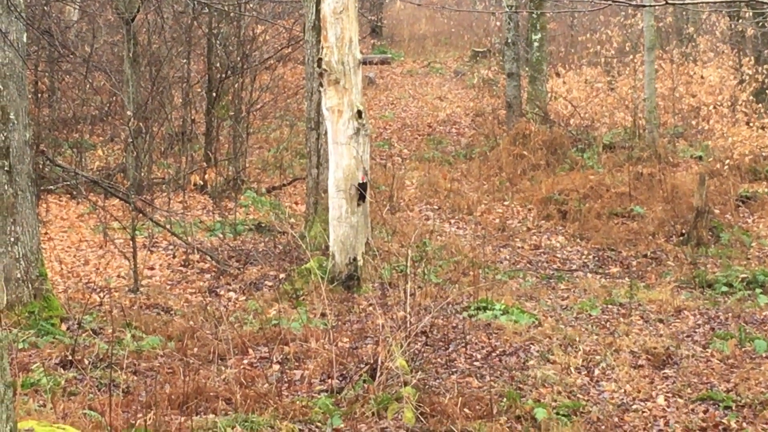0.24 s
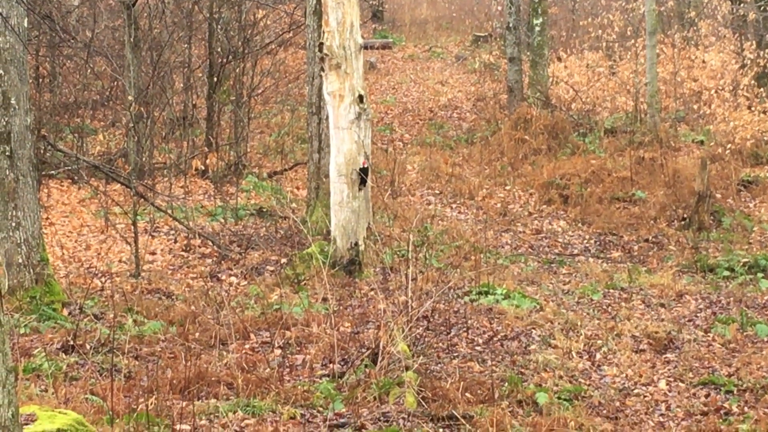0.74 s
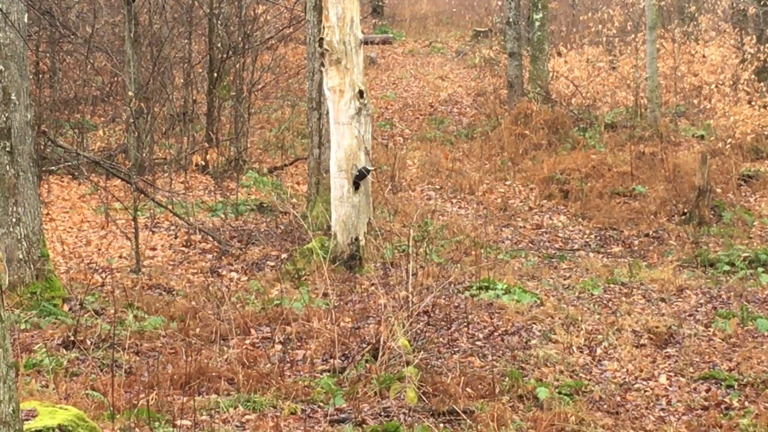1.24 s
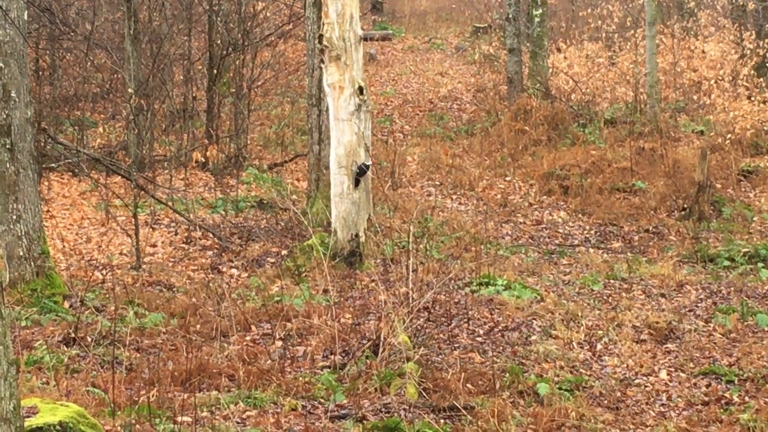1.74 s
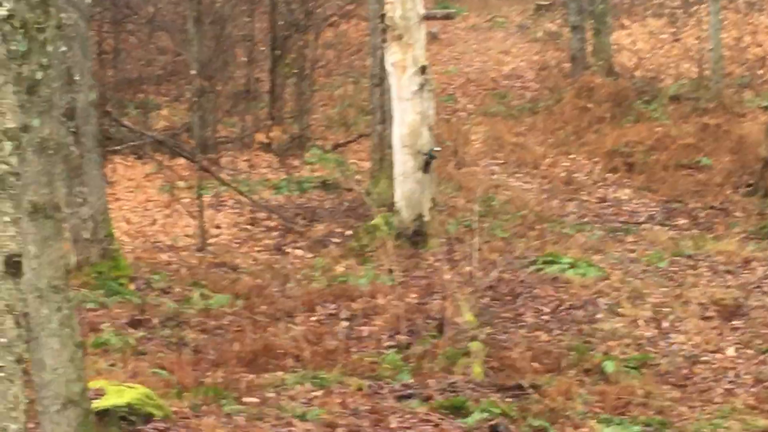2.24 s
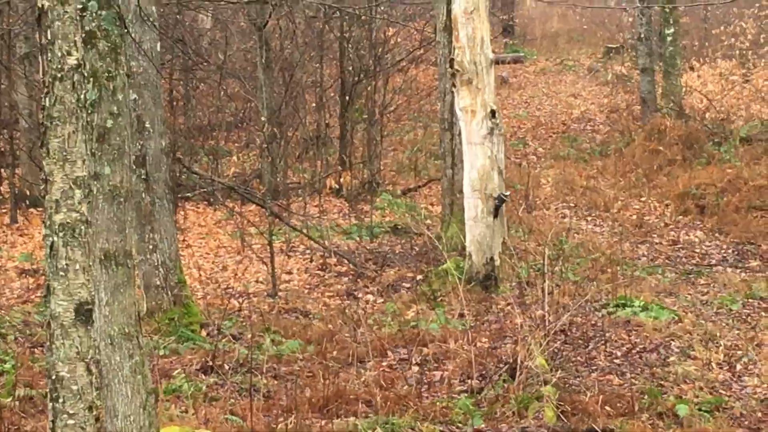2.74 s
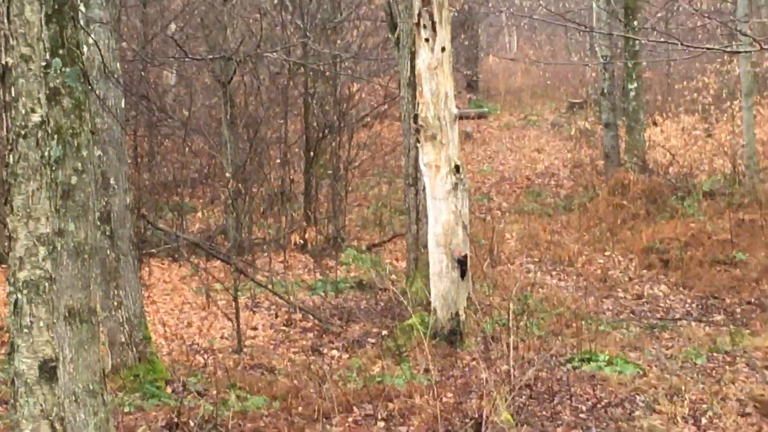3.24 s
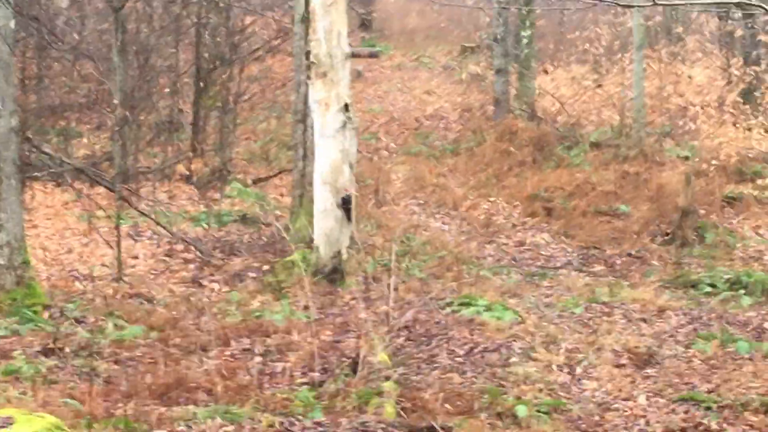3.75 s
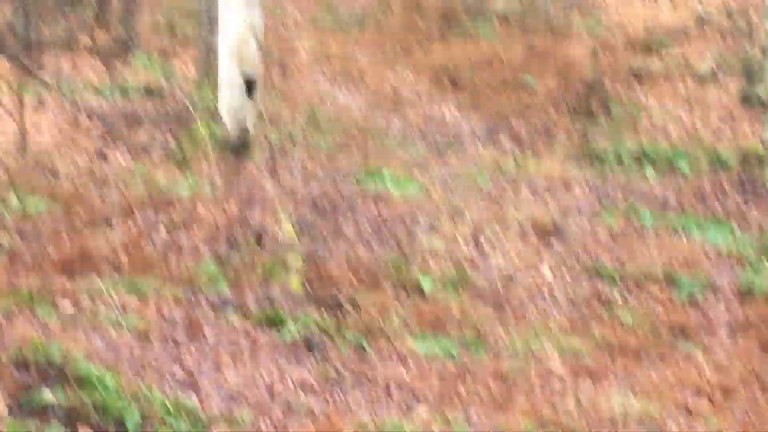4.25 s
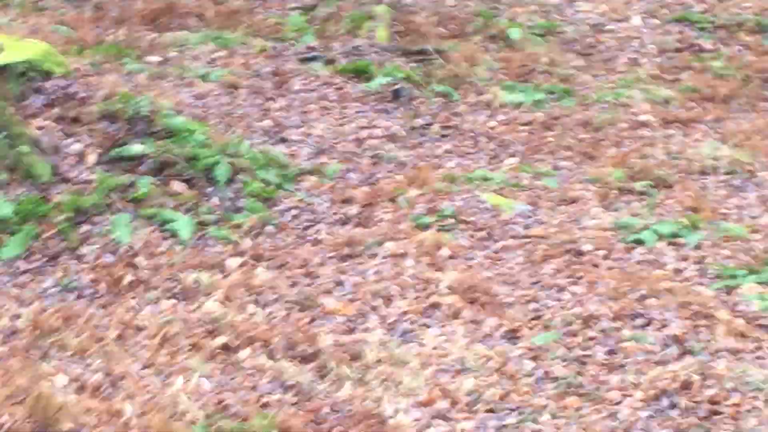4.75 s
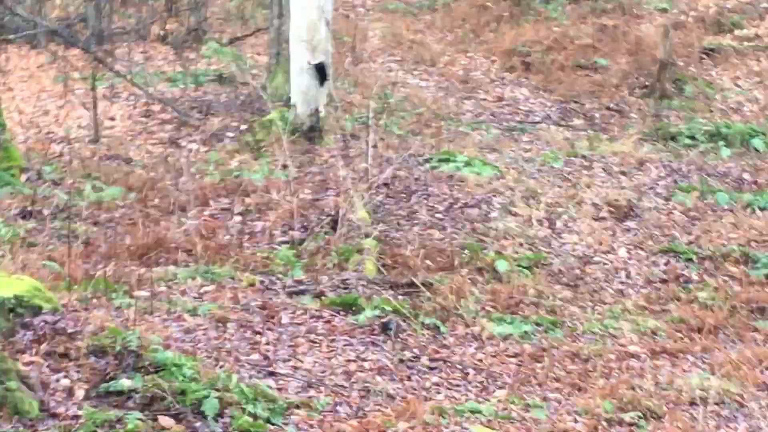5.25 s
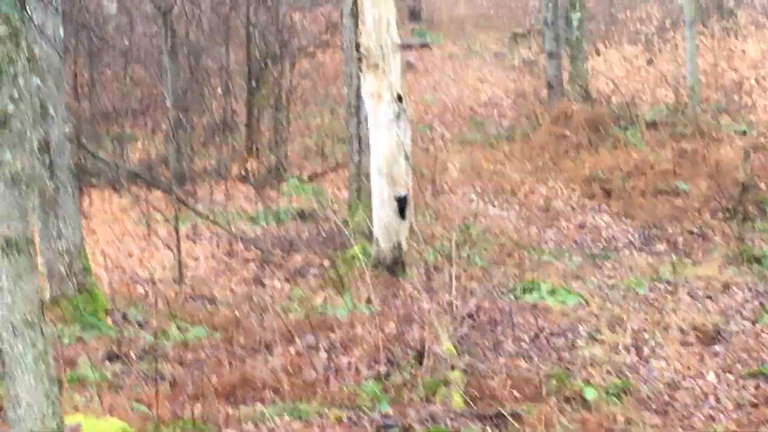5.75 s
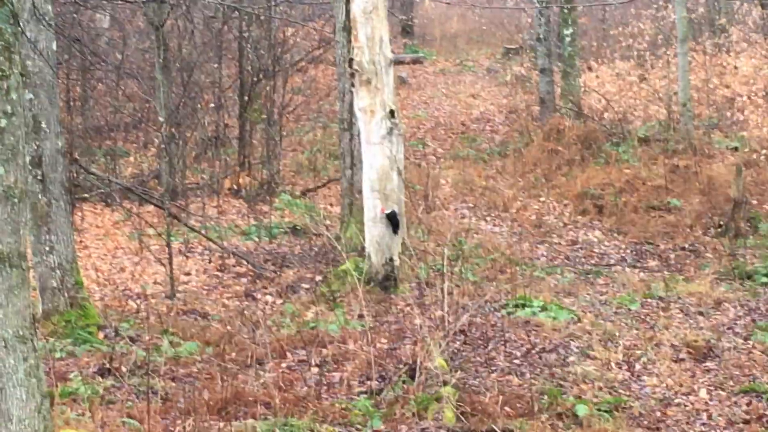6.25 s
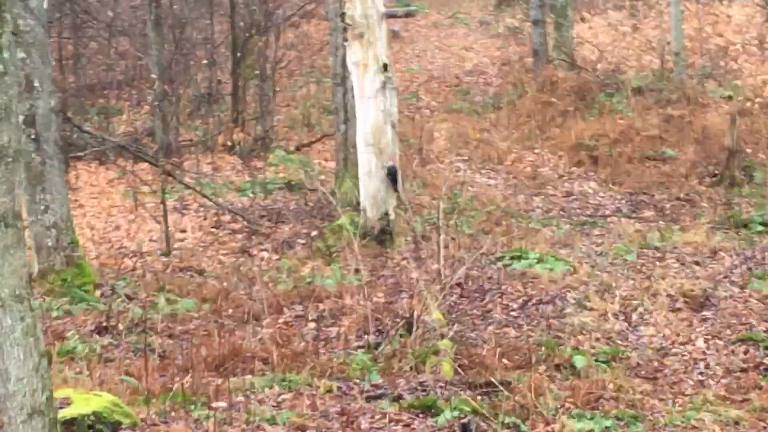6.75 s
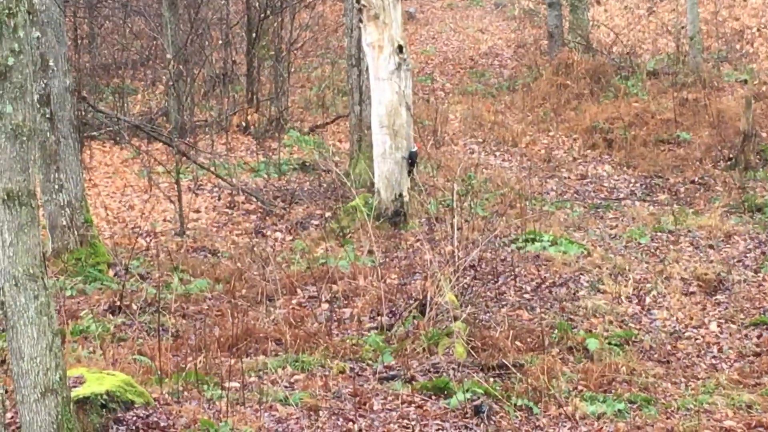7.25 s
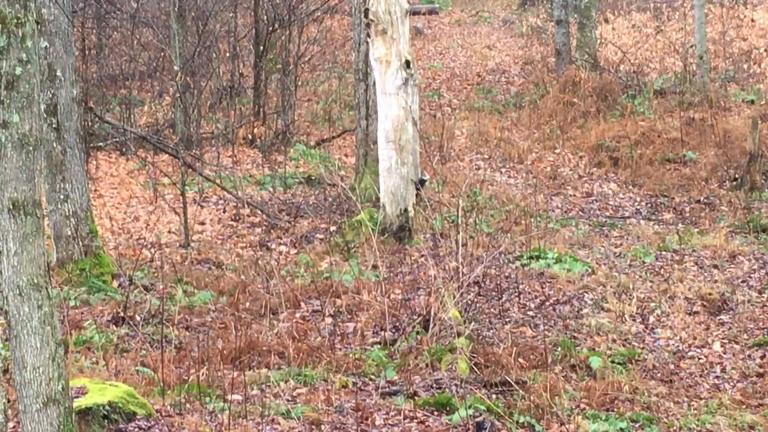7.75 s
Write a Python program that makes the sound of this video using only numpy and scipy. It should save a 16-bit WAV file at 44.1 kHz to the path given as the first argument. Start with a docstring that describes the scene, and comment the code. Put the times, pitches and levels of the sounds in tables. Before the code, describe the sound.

Quiet damp woodland, handheld camera microphone. A distant woodpecker gives faint, dull, irregular single pecks on rotten wood among tiny bright drips. A loud wet double splat hits close at 1.5 seconds. Handling thumps and leafy scuffs follow in bursts near 2.4, 2.9, 3.7 and 4.5, with a hard rap at 4.1. Later it calms, apart from a padded thud at 6.5. Low rumble and thin hiss lie beneath.

```python
"""Woodpecker in a dripping wood

A woodpecker chisels at a dead trunk some way off: noise bursts through broad resonances. Drops tick likewise,
as do a few droplets and a case knock among the pecks, and bright clicks of bumps and steps among the ticks.
Three loud knocks land right at the camera, like heavy drips or a finger on its case: damped modes and noise.
Its holder shifts their footing: clothes and leaves are grainy coloured noise, grip bumps are decaying sines.
Under all lie a low rumble and a faint hiss, both coloured noise."""
import sys
import numpy as np
from scipy.fft import rfft, irfft, next_fast_len
from scipy.io import wavfile
from scipy.ndimage import map_coordinates

SR = 44100
rng = np.random.default_rng(int(sys.argv[2]) if len(sys.argv) > 2 else 0)


def put_to_file(sound):
    """Save the sound as 16-bit audio at rate SR, in the file named by the first command-line argument."""
    columns = np.atleast_2d(sound).T  # one column per channel
    safe = np.clip(columns, -1, 1)
    whole_steps = np.round(safe * 32767)
    wavfile.write(sys.argv[1], SR, whole_steps.astype(np.int16))


N = 353020

# Spectra of the far rumble and the hiss. Each row: frequency in Hz, relative level per Hz in dB.
RUMBLE_COLOUR = [(15, -42), (25, -10), (54, -1.5), (92, 0.5), (118, -3), (147, -1), (210, -6), (305, -8),
                 (377, -12), (419, -13), (472, -19.5), (600, -20.5), (780, -28), (1320, -120)]
HISS_COLOUR = [(290, -54), (500, -8.5), (1000, -21), (1300, -3.5), (1780, -10), (2000, -8.5), (3260, -9.5),
               (3610, -11.5), (5070, -17), (7010, -18), (12100, -24), (17000, -29)]
# Clearest drops, twig snaps, and bright clicks of bumps and steps. Each row: start in seconds,
# relative level in dB, pitch in Hz.
CLEAR_TICKS = [(0.255, -46, 6500), (0.68, -42, 6450), (1.384, -44.5, 6500), (2.055, -40.5, 3260),
               (2.8803, -33, 3400), (2.9, -29, 2370), (2.9295, -33, 3000), (2.9374, -29.5, 2800),
               (2.9478, -22, 1900), (2.9635, -27, 3000), (3.6792, -28.5, 1500), (3.709, -33, 4500),
               (3.7208, -26, 1700), (3.7313, -27, 4200), (3.7535, -38, 1600), (3.7635, -31.5, 3780),
               (3.7735, -28.5, 1500), (4.4135, -40, 4500), (4.449, -44, 6000), (4.513, -46, 5500),
               (4.615, -32, 2410), (4.7451, -34, 9900), (4.762, -42, 6500), (5.0, -35, 4700),
               (5.0784, -36.5, 4100), (5.177, -36.5, 4100), (5.2655, -42, 5500), (5.2822, -36, 6000),
               (5.399, -39.5, 6500), (5.597, -41, 6500), (5.629, -45, 6000), (5.7515, -46, 5250),
               (5.8697, -41, 4450), (6.182, -47.5, 6000), (6.277, -41, 6500), (6.415, -30.5, 5500),
               (6.5455, -43, 6000), (6.641, -33, 7740), (6.641, -37, 2200)]
# Movement of the jacket. Each row: time in seconds, relative rustle level in dB, relative swish level in dB.
JACKET_MOTION = [(0.0, -60.5, -65.5), (1.0, -61.5, -72), (2.15, -62, -71), (2.42, -55.5, -59),
                 (2.7, -61, -63.5), (3.1, -58.5, -67), (3.55, -56, -57.5), (3.8, -59, -67),
                 (3.98, -54.5, -57), (4.22, -62.5, -59), (4.42, -60, -55.5), (4.52, -58.5, -54),
                 (4.64, -57, -54), (4.85, -58.5, -56), (4.94, -63.5, -63), (5.22, -63.5, -56.5),
                 (5.5, -65, -61.5), (6.3, -67, -61), (6.85, -64, -62.5), (8.0, -69.5, -67)]
# Spectra of the jacket's rustle and swish. Each row: frequency in Hz, relative level per Hz in dB.
RUSTLE_COLOUR = [(180, -49), (300, -8.5), (439, -3), (547, -8.5), (1010, -4.5), (1510, -16), (2170, -15),
                 (2750, -25.5), (3740, -18), (5020, -26.5), (8510, -30.5), (10000, -33), (13000, -92),
                 (22000, -120)]
SWISH_COLOUR = [(2350, -11.5), (4000, -8), (4510, -15), (5650, -9.5), (9390, -16), (12900, -17.5),
                (17000, -25)]
# Strokes of a sleeve. Each row: middle in seconds, level in dB, half-length in seconds, pitch in Hz,
# width in octaves.
SLEEVE_STROKES = [(2.393, -58.5, 0.021, 9900, 0.45), (2.449, -65, 0.063, 6500, 0.71),
                  (2.92, -68, 0.04, 15000, 0.35), (2.975, -52, 0.044, 3360, 0.73),
                  (3.5, -65, 0.026, 11000, 0.45), (3.491, -61, 0.07, 1500, 0.6),
                  (3.932, -56.5, 0.016, 1880, 0.4), (4.659, -65, 0.12, 2540, 0.37),
                  (6.802, -54.5, 0.022, 1310, 0.4)]
# Scuffs of shoes and leaves. Each row: start in seconds, level in dB, swell in seconds, T60 in seconds,
# tilt in dB per octave, upper edge in Hz.
FOOT_SCUFFS = [(2.431, -40.5, 0.0093, 0.12, -3, 7000), (2.562, -43, 0.013, 0.12, -3.5, 7000),
               (2.888, -45.5, 0.0053, 0.27, 0.5, 4500), (2.927, -39.5, .003, 0.025, 1, 7500),
               (2.944, -32.5, 0.0057, 0.071, 2, 6200), (2.952, -40.5, 0.016, 0.21, -0.5, 6150),
               (3.224, -43.5, 0.019, 0.069, -2, 9000), (3.657, -35, 0.022, 0.098, 0.1, 15000),
               (3.692, -38.5, 0.016, 0.04, 0.3, 16000), (3.7208, -34, 0.002, 0.073, -0.5, 4500),
               (3.729, -28, 0.0038, 0.024, 0, 9000), (3.818, -44, 0.011, 0.11, -2, 5000),
               (4.372, -42, 0.012, 0.12, -2.5, 2800), (4.608, -53, 0.0056, 0.23, 3, 3200),
               (4.883, -47.5, 0.007, 0.06, 0, 4000)]
# Spectrum of friction before tilting. Each row: frequency in Hz, relative level per Hz in dB.
FRICTION_COLOUR = [(200, -8), (340, -2.5), (406, -8.5), (517, -13.5), (725, -6.5), (969, -10.5), (1070, -7),
                   (1140, -11), (2000, -11), (2760, -19), (4340, -17), (8530, -28.5), (12200, -36),
                   (16000, -35)]
# Bumps of the grip. Each row: start in seconds, thump level in dB, thump pitch in Hz, grit level in dB,
# case knock level in dB, sway pitch in Hz, sway level in dB.
GRIP_BUMPS = [(2.399, -39, 130, -56, -51, 60.3, -43), (2.4514, -33.5, 150, -50, -48, 69, -42),
              (2.566, -36, 90, -52, -53, 50, -41), (2.881, -30.5, 150, -37.5, -37, 79, -38.5),
              (2.8993, -43, 111, -43, -42, 70, -51), (2.932, -31.5, 161, -39, -48, 70, -48),
              (2.9374, -30, 330, -48, -50, 70, -52), (2.949, -23.5, 377, -41, -40, 161, -35),
              (2.9541, -25.5, 342, -40, -46, 170, -39), (2.963, -28.5, 258, -41, -46, 65, -37),
              (2.98, -29, 328, -42, -47, 70, -50), (3.687, -25.5, 70.5, -47, -49, 55, -46),
              (3.7133, -27, 175, -40, -40, 60, -37), (3.7207, -31, 133, -28, -35, 55, -33),
              (3.73, -15.5, 50.8, -29, -33, 60, -24.5), (3.764, -32, 126, -32, -34, 60, -43),
              (3.776, -32, 300, -55, -46, 70, -48), (4.1565, -31, 166, -34, -30, 91, -37.5),
              (4.382, -29.5, 125, -48, -42, 64.6, -33.5), (4.423, -48, 180, -51, -36.5, 70, -50),
              (4.4643, -32.5, 216, -52, -32.5, 76, -34), (4.5418, -26, 195, -38, -31, 55, -30),
              (4.589, -27, 147, -40, -33.5, 55, -34), (4.5993, -22, 210, -38, -27, 85, -36.5),
              (4.6146, -40, 129, -44, -38, 54.7, -37)]
# Modes of the case before detuning. Each row: frequency in Hz, relative level in dB, T60 in seconds.
CASE_MODES = [(330.5, -7.5, .04), (646, -7, .022), (790, -5.5, 0.017), (1000, -7, 0.02), (1550, -14, .012),
              (2300, -15.5, 0.032)]
# A heavy drop and a smaller one. Each row: start in seconds, relative ring level in dB, spray level in dB.
DROP_SPLATS = [(1.472, -1.5, -24.5), (1.5055, -18.5, -35.5)]
# Modes of the three close knocks; the splat's are lowered by its ring level. Each row: frequency in Hz,
# level in dB, T60 in seconds.
SPLAT_RING = [(167, -24.5, 0.083), (296, -20, 0.05), (400, -29, 0.04), (570, -42, 0.072), (685, -34, 0.025),
              (991, -32, 0.092), (1106, -23, 0.031), (1400, -46, 0.032), (1790, -38, .018),
              (2010, -32, .02), (2390, -28.5, 0.017), (3160, -39, .04), (3450, -42, 0.03)]
RAP_RING = [(133, -45.5, 0.087), (256, -13.5, 0.0153), (410, -26, 0.0354), (960, -3.5, 0.0048),
            (1660, -8.5, 0.0056), (3150, -16.5, 0.0051), (4570, -28, 0.02), (5610, -17.5, 0.0078),
            (8620, -19, 0.0023)]
THUD_RING = [(89, -20.5, 0.058), (181, -24.5, 0.079), (410, -26.5, 0.033), (630, -16, 0.017),
             (775, -25.5, 0.011), (1155, -19, 0.015), (1360, -15.5, 0.0045), (1970, -24.5, 0.012),
             (2495, -28.5, 0.016), (5770, -31, 0.0037)]
# Spectra of the splat's spray and of the rattle, before tilting. Each row: frequency in Hz,
# relative level per Hz in dB.
SPRAY_COLOUR = [(200, -3), (450, -4), (750, -3.5), (1120, -2), (1340, -5.5), (1810, -15), (2380, -15),
                (2750, -17), (3470, -13), (4200, -19.5), (9010, -22.5), (16000, -38)]
RATTLE_COLOUR = [(210, -22), (350, -22), (622, -2.5), (1160, 2.5), (2100, -19.5), (2420, -19),
                 (2840, -13.5), (3620, -14.5), (4980, -19), (5570, -17.5), (7430, -27), (9000, -28),
                 (10100, -35), (16000, -48)]
# Woodpecker's pecks, with a few droplets and a case knock played alike. Each row: start in seconds,
# relative level in dB, pitch in Hz, click level in dB relative to the tock.
TOCKS = [(0.216, -41, 1140, -9.5), (1.184, -45.5, 1210, -26), (1.569, -43.5, 1150, -1),
         (1.642, -44.5, 950, -6), (1.935, -47, 950, -14), (2.046, -50, 1100, -18),
         (2.717, -41.5, 1100, -11), (4.423, -44, 760, -6), (4.722, -34.5, 1430, -19), (4.866, -44, 1154, 2),
         (4.871, -42.5, 900, -5), (5.155, -44, 1230, 1), (5.202, -40, 2110, -13), (6.283, -46, 1226, -4),
         (6.696, -40, 1150, -6), (7.009, -50, 1800, -12), (7.056, -36, 1193, -9.5),
         (7.63, -41.5, 1200, -13)]

# Unevenness of rubbing: depth in dB and rate per second of its catches
CLUMP_DB, CLUMPS_PER_S = 3.2, 300


def amp(db):
    """A level in decibels is twenty times the logarithm of the gain."""
    return 10 ** (np.asarray(db) / 20)


def unit(x):
    """Division by the root mean square brings a signal to rms 1."""
    return x / np.sqrt(np.mean(x ** 2) + 1e-20)


def clock(seconds):
    """Sampling places instants at equal intervals."""
    return np.arange(int(seconds * SR)) / SR


def curves(rows):
    """Linear interpolation over the time column gives every other column one value per sample."""
    s, *columns = np.transpose(rows)
    return [np.interp(np.arange(N) / SR, s, column) for column in columns]


def wobble(rate, size):
    """Spline interpolation of random knots, rate of them a second, gives a smooth random curve."""
    knots = rng.standard_normal(int(size * rate / SR) + 4)
    return map_coordinates(knots, [np.arange(size) * rate / SR])


def filtered(x, response):
    """A linear filter multiplies the spectrum by its frequency response."""
    m = next_fast_len(len(x) + 8192)
    hz = np.fft.rfftfreq(m, 1 / SR) + 1  # the offset keeps clear of zero
    return irfft(rfft(x, m) * response(hz), m)[:len(x)]


def coloured(force, spectrum, tilt_db):
    """Spectral shaping, with a tilt in dB per octave, colours an excitation and leaves it at rms 1."""
    hz, db = np.transpose(spectrum)

    def response(f):
        return amp(np.interp(np.log(f), np.log(hz), db) + tilt_db * np.log2(f))
    return unit(filtered(force, response))


def noise(spectrum, size, tilt_db=0):
    """Shaped white noise models a dense, steady turmoil."""
    return coloured(rng.standard_normal(size), spectrum, tilt_db)


def crackly(spectrum, size, rate, share, tilt_db=0):
    """Sparse random impulses, rate a second, carry a share of the excitation's power; noise carries the rest."""
    happens = rng.random(size) < rate / SR
    snaps = happens * rng.uniform(-1.18, 1, size) * rng.random(size)
    force = np.sqrt(share) * unit(snaps) + np.sqrt(1 - share) * rng.standard_normal(size)
    return coloured(force, spectrum, tilt_db)


def fade(t, rise, t60):
    """Exponential decay follows a linear rise to 1; T60 is the time to fall by 60 dB."""
    return np.minimum(t / rise, 1) * np.exp(-np.log(1000) * np.maximum(t - rise, 0) / t60)


def ring(modes, t, rise):
    """Superposition of damped modes describes a struck body."""
    return sum(amp(db) * fade(t, rise, t60) * np.sin(2 * np.pi * hz * t) for hz, db, t60 in modes)


def body(modes, t, cycles):
    """A rise of fixed length in cycles makes low modes trail high ones; their signs alternate."""
    return sum((-1) ** k * ring([mode], t, cycles / mode[0]) for k, mode in enumerate(modes))


def tap(hz, q, t60, tail_db, tail_t60):
    """A resonance filters a brief noisy contact and its scatter; the energy is that of 1 ms at rms 1."""
    t = clock(.2)
    envelope = fade(t, 0.00021, t60) + amp(tail_db) * fade(t, 0.0024, tail_t60)
    force = rng.standard_normal(len(t)) * envelope
    y = filtered(force, lambda f: 1 / (1 + 1j * q * (f / hz - hz / f)))
    return y / np.sqrt(np.sum(y ** 2) * 1000 / SR)


def grit(size, tilt_db, edge_hz):
    """Friction is intermittent: small crunches bunch into uneven catches, thin above an edge; rms 1."""
    grain_db, grains_per_s = 3, 1400
    crunches_per_s, crunch_share = 650, .5
    airy_db = -23  # floor of the response, which remains above the edge
    catches_db = grain_db * np.tanh(wobble(grains_per_s, size))
    catches_db = catches_db + CLUMP_DB * np.tanh(wobble(CLUMPS_PER_S, size))
    crunches = crackly(FRICTION_COLOUR, size, crunches_per_s, crunch_share, tilt_db)
    grains = amp(catches_db) * crunches
    return unit(filtered(grains, lambda f: 1 / np.sqrt(1 + (f / edge_hz) ** 6) + amp(airy_db)))


def add(track, s, sound):
    """Superposition adds a sound to the track from s seconds on."""
    part = track[max(round(s * SR), 0):][:len(sound)]
    part += sound[:len(part)]


def woodland():
    """Stationary noise gives a thin hiss; slow amplitude modulation rolls a far rumble that gradually ebbs."""
    start_db, ebb_db_per_s = -47, -0.4949
    roll_db, rolls_per_s = 1.5, 12
    hiss_db = -66.5
    rumble_db = start_db + ebb_db_per_s * np.arange(N) / SR + roll_db * wobble(rolls_per_s, N)
    return amp(rumble_db) * noise(RUMBLE_COLOUR, N) + amp(hiss_db) * noise(HISS_COLOUR, N)


def ticks():
    """Short impacts excite broad resonances: drops, snaps and handling clicks, fainter far drips, trodden leaves."""
    spread_db = 8  # from the faintest to the loudest far drip or crackle
    out = np.zeros(N)
    for s, db, hz in CLEAR_TICKS:
        tick = tap(hz, q=0.98, t60=0.0075, tail_db=-21.0, tail_t60=0.11)
        tick = filtered(tick, lambda f: 1 / np.sqrt(1 + (f / (2.1 * hz)) ** 4))  # the lower, the softer
        add(out, s, amp(db - 7.0) * tick)
    # start in seconds, faintest level in dB, lowest pitch in Hz
    drips = [(when * N / SR, -61, 2800) for when in rng.random(size=30)]
    crackles = [(s, -55, 3260) for s in rng.uniform(4.3, 6.4, size=10)]
    for s, db, hz in drips + crackles:
        size, octave = rng.random(2)
        faint = tap(hz * 2 ** octave, q=0.99, t60=0.0074, tail_db=-34.5, tail_t60=.04)
        add(out, s, amp(db + spread_db * size) * faint)
    return filtered(out, lambda f: 1 / np.sqrt(1 + (f / 13000) ** 4))  # wet leaves soften the top


def clothes():
    """Cloth friction is modulated noise: movement sets the level of rustle and swish, catching fibres grain both."""
    surge_db, surges_per_s = 1.2, 22
    fibres_per_s, fibre_share = 130, .22
    rustle_db, swish_db = curves(JACKET_MOTION)
    catch = wobble(160, N)
    swish_db = swish_db + surge_db * wobble(surges_per_s, N)
    rustle = amp(rustle_db + 2.03 * catch) * noise(RUSTLE_COLOUR, N)
    fibres = crackly(SWISH_COLOUR, N, fibres_per_s, fibre_share)
    return rustle + amp(swish_db - 6.5 + 1.9 * catch) * fibres


def sleeves():
    """Band-limited friction noise under a bell-shaped envelope represents each stroke of cloth on cloth."""
    out, t = np.zeros(N), clock(.3)
    middle = t.mean()
    for s, db, half, hz, octaves in SLEEVE_STROKES:
        white = rng.standard_normal(len(t))
        rub = filtered(white, lambda f: np.exp(-(np.log2(f / hz) / octaves) ** 2 / 2))
        rub = unit(rub * amp(CLUMP_DB * wobble(CLUMPS_PER_S, len(t))))
        swell = np.exp(-((t - middle) / half) ** 2 / 2)
        add(out, s - middle, amp(db) * rub * swell)
    return out


def footing():
    """Granular friction of leaves underfoot swells as the weight comes on, then decays exponentially."""
    out, t = np.zeros(N), clock(.4)
    for s, db, swell, t60, tilt_db, edge_hz in FOOT_SCUFFS:
        add(out, s, amp(db) * grit(len(t), tilt_db, edge_hz) * fade(t, swell, t60))
    return out


def grip():
    """A bump excites four responses: skin friction, modes of the case, a short thump and a slower sway."""
    detune = 0.0412  # each contact finds the case at a slightly different pitch
    out, t = np.zeros(N), clock(.4)
    for s, db, hz, grit_db, knock_db, sway_hz, sway_db in GRIP_BUMPS:
        thump = ring([(hz, db, 6.8 / hz)], t, rise=0.45 / hz)  # T60 and rise as numbers of cycles
        sway = ring([(sway_hz, sway_db, 0.22)], t, rise=0.0096)  # the camera rocks in the hand
        scrape = grit(len(t), tilt_db=-2.5, edge_hz=4200) * fade(t, rise=0.00044, t60=0.025)
        knock = body(CASE_MODES, t * (1 + detune * rng.uniform(-1.2, 1)), cycles=0.3)
        add(out, s, thump + sway + amp(grit_db) * scrape + amp(knock_db) * knock)
    return out


def knocks():
    """Modal decay and brief noise together form a wet double splat, a hard rap and a padded thud."""
    out, t = np.zeros(N), clock(.25)
    for s, ring_db, spray_db in DROP_SPLATS:
        spray = amp(spray_db) * noise(SPRAY_COLOUR, len(t), tilt_db=-0.5) * fade(t, 0.0019, 0.051)
        add(out, s, amp(ring_db) * body(SPLAT_RING, t, cycles=2.7) + spray)
    # the case stills fast, the surroundings answer faintly
    dying = fade(t, .002, .028) + amp(-21) * fade(t, .004, .09)
    rattle = amp(-21.0) * noise(RATTLE_COLOUR, len(t), tilt_db=1.5) * dying
    add(out, 4.1394, body(RAP_RING, t, cycles=0.42) + rattle)
    patter = amp(-34.0) * noise(RATTLE_COLOUR, len(t), tilt_db=-1.5) * fade(t, 0.00084, 0.065)
    add(out, 6.5305, body(THUD_RING, t, cycles=0.68) + patter)
    return out


def tocks():
    """Heavy damping, as in rotten wood, broadens resonance: pecks, a few droplets and a case knock all sound so."""
    contact_t60 = 0.0086  # seconds
    hollow_db = -13.5  # relative to the tock
    out = np.zeros(N)
    for s, db, hz, click_db in TOCKS:
        tock = tap(hz, q=1.4, t60=contact_t60, tail_db=-20, tail_t60=.08)
        # for a peck: soft wood swallows the overtones
        tock = filtered(tock, lambda f: 1 / np.sqrt(1 + (f / (1.5 * hz)) ** 4))
        hollow = tap(340, q=3.9, t60=contact_t60, tail_db=-19, tail_t60=.08)
        click = tap(2470, q=1.1, t60=.012, tail_db=-25, tail_t60=.07)
        add(out, s, amp(db + 2.0) * (tock + amp(hollow_db) * hollow + amp(click_db) * click))
    return filtered(out, lambda f: 1 / (1 + (f / 10000) ** 2))  # dulls the top, as distance does


def scene():
    """Superposition sums all sources at one microphone."""
    background = woodland() + ticks()
    holder = clothes() + sleeves() + footing() + grip()
    return (background + holder + knocks() + tocks())[None]


def record(dry):
    """Band limitation and saturation: the camera sheds the deepest bass, clips at full scale and cuts the top."""
    top_hz = 17250
    lean = filtered(dry[0], lambda hz: 1 / np.sqrt(1 + (32 / hz) ** 6))
    return filtered(np.clip(lean, -1, 1), lambda hz: hz < top_hz)[None]


dry = scene()
out = record(dry)
put_to_file(out)
```